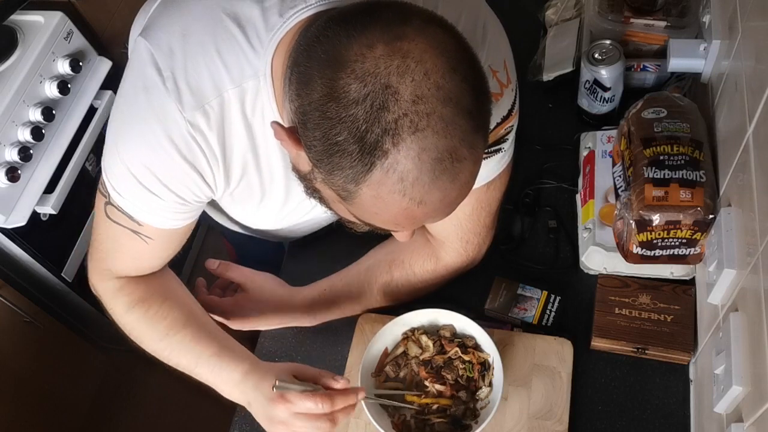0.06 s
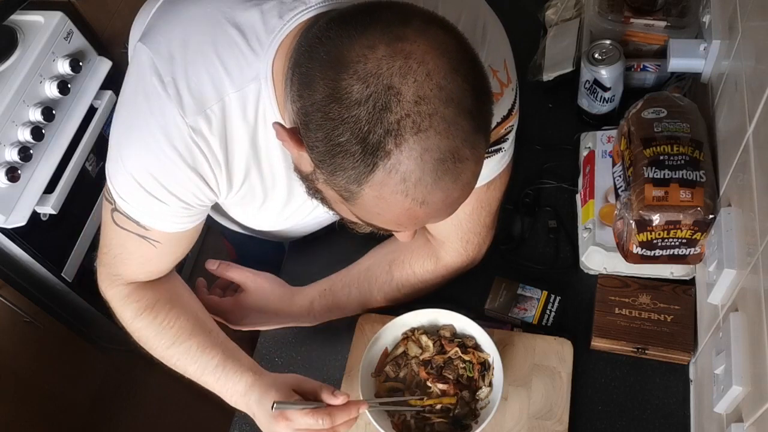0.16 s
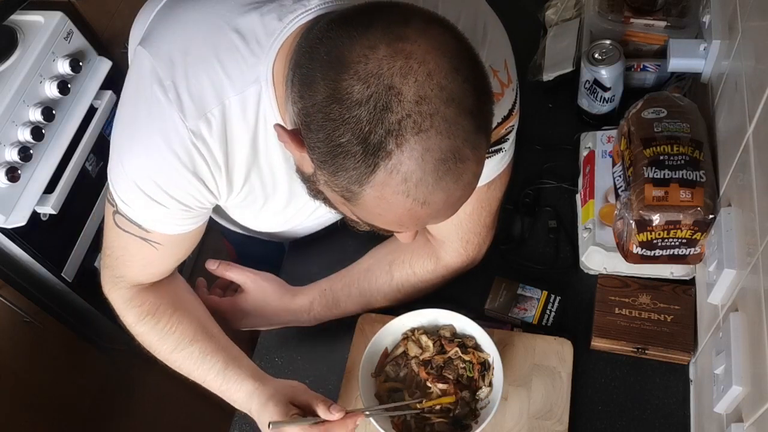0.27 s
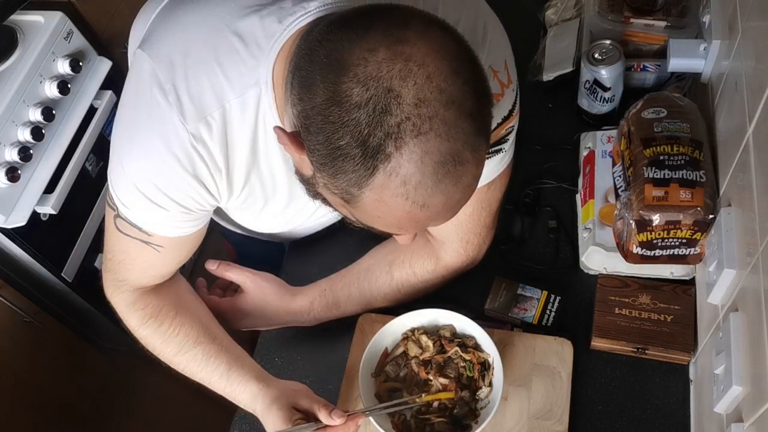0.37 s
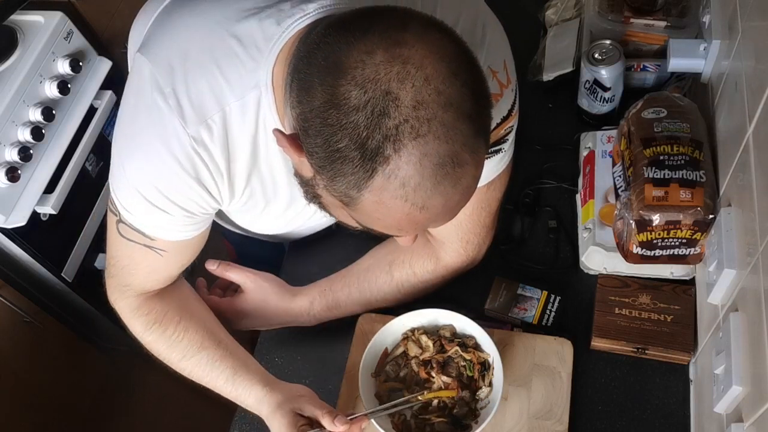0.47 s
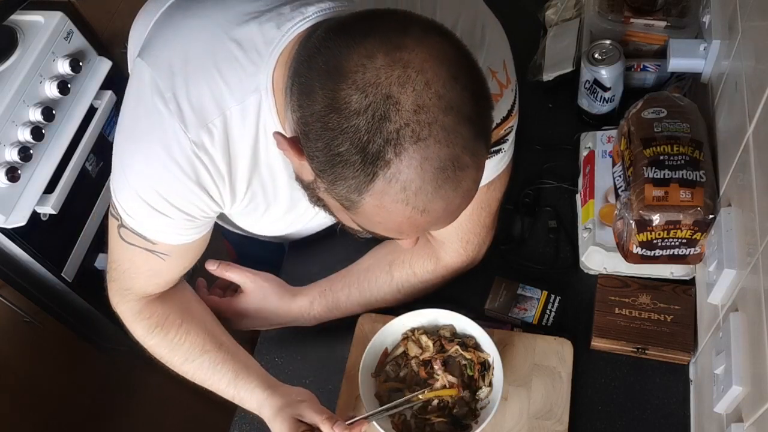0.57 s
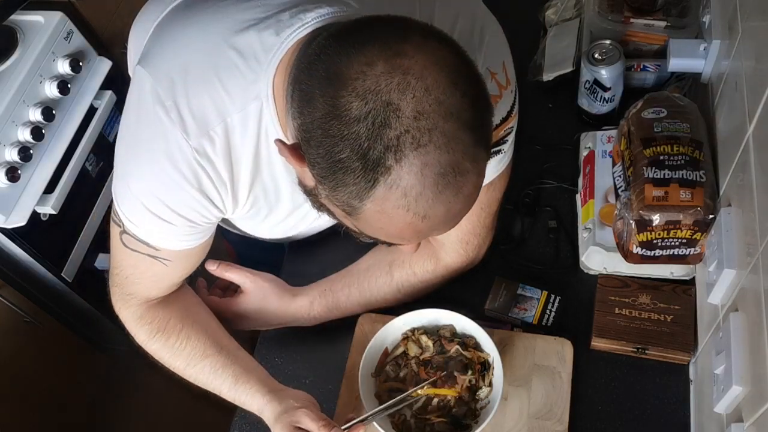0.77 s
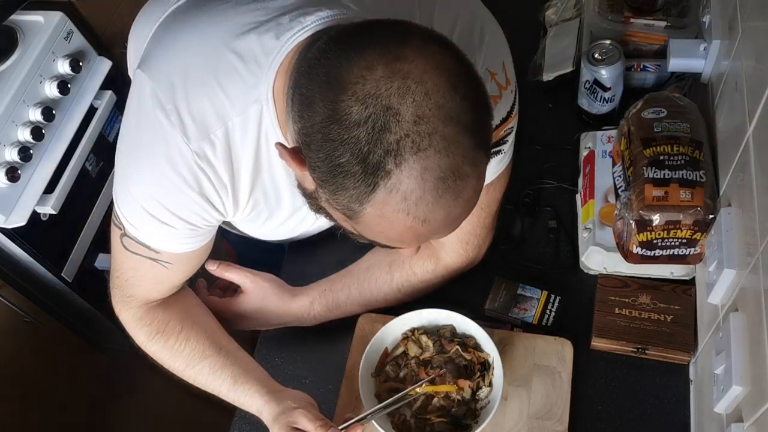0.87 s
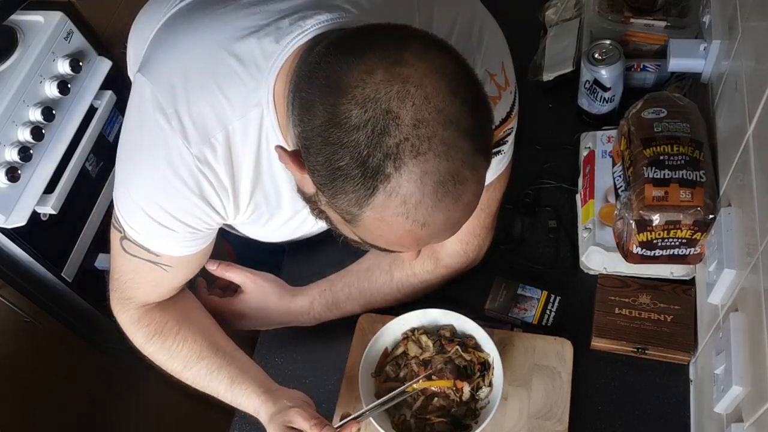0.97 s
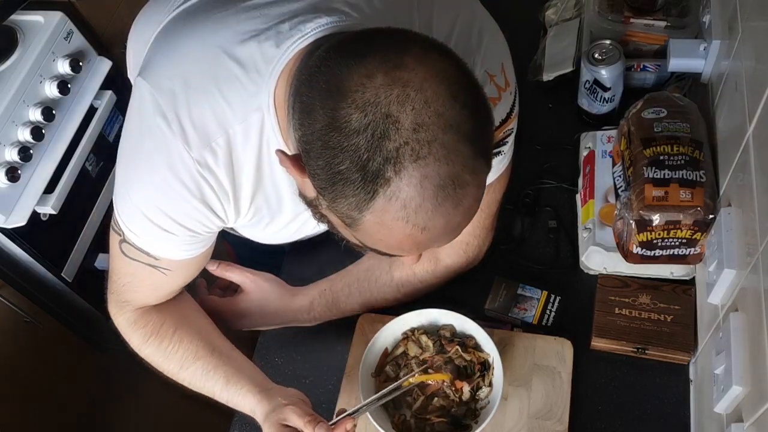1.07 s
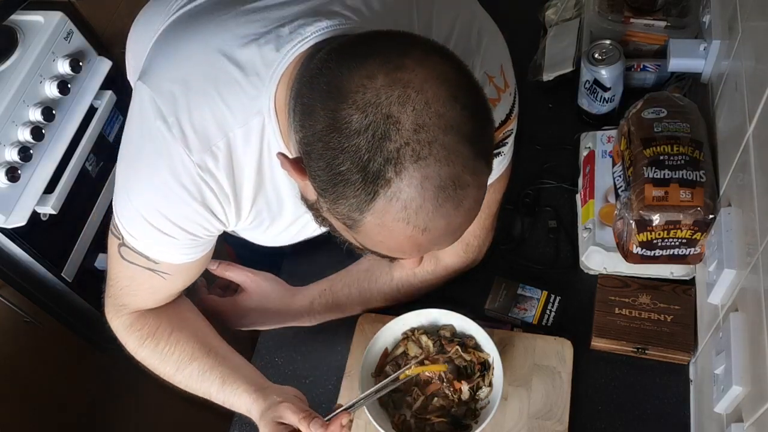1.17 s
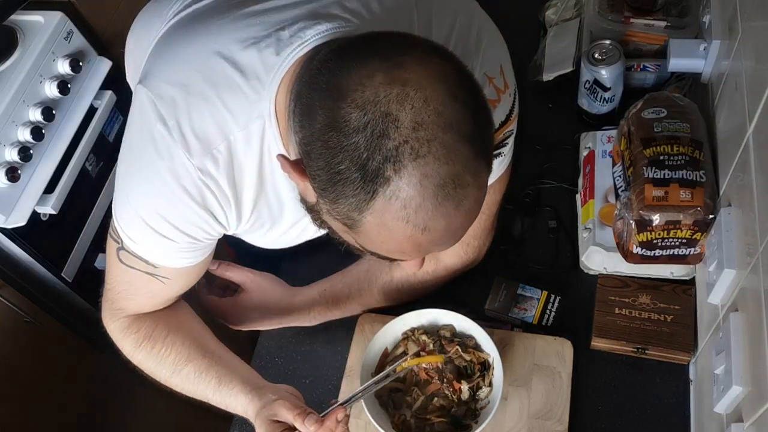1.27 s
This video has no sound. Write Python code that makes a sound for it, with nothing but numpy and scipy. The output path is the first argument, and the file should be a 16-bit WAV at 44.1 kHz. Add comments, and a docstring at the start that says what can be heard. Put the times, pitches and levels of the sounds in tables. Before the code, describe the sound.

After a barely audible rustle of noodles, chopsticks clack rapidly twice on a bowl rim, ringing briefly with a short room tail; soft moist stirring follows, close up indoors, over steady faint hiss and mains hum.

```python
"""In a small kitchen, metal chopsticks give a quick double clack at a ceramic bowl.
Each contact is a noise crack that excites decaying modes of the sticks and, a little longer, the bowl.
A dull thud and a low swell follow. Before and after, filtered grains make soft strokes through wet
noodles, with short pitched noise bursts as squelches. Random reflections and a decaying tail carry
clacks and noodles; mains hum from sines and thin hiss from coloured noise lie beneath."""
import sys
import numpy as np
from scipy import signal
from scipy.fft import rfft, irfft
from scipy.io import wavfile
from scipy.ndimage import uniform_filter1d

SR = 44100
rng = np.random.default_rng(int(sys.argv[2]) if len(sys.argv) > 2 else 0)


def dump_mix(stems):
    """Bounce the given channels to the path in sys.argv[1] as a 16-bit WAV at rate SR."""
    frames = np.atleast_2d(stems).T  # one column per channel
    limited = np.clip(frames, -1, 1)  # hard clip at full scale
    pcm = np.round(limited * 32767).astype(np.int16)
    wavfile.write(sys.argv[1], SR, pcm)


N = 57330
T, HZ = np.arange(N) / SR, np.fft.rfftfreq(2 * N, 1 / SR)  # time in s, frequency in Hz

# Contacts of sticks and bowl, the last two only 3 ms apart:
# start_s [s], level_db [dB, relative], brightness [dB per octave], bowl_share_db [dB]
CONTACTS = [(0.2001, 1.5, -2.5, -13), (.2162, 0.5, 3.5, -2), (.2192, -5.5, 1, 3)]
# Bending modes of the two sticks, damped by the fingers: pitch_hz [Hz], level_db [dB], t60_s [s]
STICK_MODES = [(1080, -10, 0.045), (1241.5, -11, .07), (2495, -12, 0.024), (2800, -5, 0.021),
               (3546, -1.5, 0.035), (3900, -2.5, 0.041), (4470, -1, 0.027), (4592, -14, 0.038),
               (5650, -3, 0.016), (6148, 5, 0.017), (6465, -4, 0.018), (8010, -10.5, 0.019),
               (9050, -9, 0.039), (10630, -7, 0.025), (11350, -9.5, 0.068), (13450, -6, 0.031)]
# Modes of the glazed bowl: pitch_hz [Hz], level_db [dB], t60_s [s]
BOWL_MODES = [(3465, -28, 0.082), (3725, -21, 0.26), (4039, -11, .17), (6150, -20, .17), (6050, -18, 0.12),
              (5960, -12, 0.29), (9150, -18, 0.15), (11247, -20.5, 0.11), (13640, -25, .1)]
# Colour of a whole contact, crack and ring together: frequency_hz [Hz], gain_db [dB]
CONTACT_COLOUR = [(100, -21), (250, -7.5), (480, -10.5), (600, -27), (830, -12), (1030, -7), (1300, -7.5),
                  (1600, -12), (1900, -18), (2300, -2), (2780, -1.5), (3120, -3.5), (3450, 1), (4600, 0),
                  (5000, 2), (5700, -0.5), (6700, 0.5), (7600, -2), (11000, -4), (14500, -7), (16000, -24)]
CLACK_DB, CRACK_DB = -22, 4.5  # all contacts; crack relative to the ring
CONTACT_RISE_S, CRACK_DECAY_S = 0.00031, 0.0026
PIVOT_HZ = 4500  # brightness tilts about this frequency
STICK_RATTLE, BOWL_RATTLE = 0.49, 1  # unsteadiness of the ring; the sticks lie against the rim
RATTLE_HZ = 63


def clacks():
    """Impact excitation: each short contact cracks and rings both bodies, with its own spectral tilt."""
    out = np.zeros(N)
    octaves = np.log2(np.clip(HZ, 2200, 16000) / PIVOT_HZ)
    rise = 1 - np.exp(-T / CONTACT_RISE_S)
    burst = rise * np.exp(-T / CRACK_DECAY_S)
    for start_s, level_db, brightness, bowl_share_db in CONTACTS:
        crack = np.linalg.norm(burst) * even(rng.standard_normal(N) * burst)
        sticks = ring(STICK_MODES, STICK_RATTLE)
        bowl = amp(bowl_share_db) * ring(BOWL_MODES, BOWL_RATTLE)
        contact = amp(CRACK_DB) * crack + rise * (sticks + bowl)
        contact = colour(contact, read(CONTACT_COLOUR) + brightness * octaves)
        out += amp(level_db) * later(contact, start_s)
    return amp(CLACK_DB) * out


def ring(modes, rough):
    """Modal superposition: damped partials, each randomly modulated in amplitude and phase."""
    t, out = T[:N // 4], np.zeros(N)
    smooth = signal.butter(2, RATTLE_HZ, fs=SR)
    for pitch_hz, level_db, t60_s in modes:
        noise = signal.lfilter(*smooth, rng.standard_normal((2, 2 * len(t))))
        in_phase, quadrature = unit(noise[:, len(t):])  # the filter's onset is dropped
        phase = 2 * np.pi * (pitch_hz * t + rng.random())
        partial = (1 + rough * in_phase) * np.cos(phase) + rough * quadrature * np.sin(phase)
        out[:len(t)] += amp(level_db - 60 * t / t60_s) * partial
    return out / np.sqrt(1 + 2 * rough ** 2)  # roughness leaves the mean power alone


# Colour of the bowl's thud on its wooden board: frequency_hz [Hz], gain_db [dB, relative]
THUD_COLOUR = [(50, -12), (115, -9.5), (170, -12), (250, -1), (320, -2.5), (430, 3), (510, -4.5),
               (580, -18.5), (2000, -40)]
THUD_DB, THUD_RISE_S, THUD_DECAY_S = -50.5, 0.018, 0.051
BOOM_HZ, BOOM_DB = 370, -50.5
BOOM_SPREAD_RAD = 1.16  # phase lead of the right channel
BOOM_LAG_S, BOOM_WIDTH_S = .074, .036  # peak after the first contact, width of the bell


def push():
    """Damped impact and resonance: a dull thud on the board, then a low room resonance that swells."""
    start_s = CONTACTS[0][0]
    envelope = later(swell(THUD_RISE_S, THUD_DECAY_S), start_s)
    thud = shaped(colour(pair_noise(), read(THUD_COLOUR)), envelope)
    phase = 2 * np.pi * (BOOM_HZ * T + rng.random()) + np.array([[0], [BOOM_SPREAD_RAD]])
    bell = np.exp(-((T - start_s - BOOM_LAG_S) / BOOM_WIDTH_S) ** 2)
    return amp(THUD_DB) * thud + amp(BOOM_DB) * bell * np.sin(phase)


# Strokes through the noodles:
# start_s [s], length_s [s], level_db [dB, relative], centre_hz [Hz], width [octaves]
STROKES = [(0.109, 0.076, -63, 413, 0.95), (0.094, 0.12, -68, 2000, 1.5), (0.393, 0.046, -59, 3470, 1.55),
           (0.483, 0.025, -58.5, 4630, 0.55), (0.643, 0.069, -60.5, 1720, 1.6),
           (0.786, 0.02, -64.5, 2150, .6), (0.85, 0.099, -60, 2500, 2.4), (0.89, .15, -60.5, 4970, 0.47),
           (1.081, 0.058, -61.5, 910, 1.64)]
# Wet squelches: start_s [s], level_db [dB, relative], pitch_hz [Hz], decay_s [s]
WET_SQUELCHES = [(0.693, -59, 1080, 0.006), (.960, -60.5, 756, 0.007), (.964, -51.5, 1490, 0.003),
                 (0.962, -61, 3020, 0.0079), (1.078, -59, 357, 0.01), (1.244, -65.5, 2280, 0.015)]
NOODLES_DB = 0.5
GRAINS_PER_S, GRAIN_SPREAD_DB = 3500, 3
SQUELCH_WIDTH_OCTAVES, SQUELCH_RISE_S = .16, .003


def noodles():
    """Granular friction: strokes of tiny sticky crackles, and narrow-band squelches with a pitch."""
    out = np.zeros(N)
    for start_s, length_s, level_db, centre_hz, width in STROKES:
        sizes = rng.standard_normal(N) * amp(GRAIN_SPREAD_DB * rng.standard_normal(N))
        grains = sizes * (rng.random(N) < GRAINS_PER_S / SR)
        arch = np.sqrt(abs(np.sin(np.pi * np.clip((T - start_s) / length_s, 0, 1))))
        band_db = bump(centre_hz, width) - 10 * np.log10(1 + HZ / centre_hz)  # softened treble
        out += amp(level_db) * shaped(colour(grains, band_db), arch)
    for start_s, level_db, pitch_hz, decay_s in WET_SQUELCHES:
        noise = colour(rng.standard_normal(N), bump(pitch_hz, SQUELCH_WIDTH_OCTAVES))
        out += amp(level_db) * shaped(noise, later(swell(SQUELCH_RISE_S, decay_s), start_s))
    return amp(NOODLES_DB) * out


# Decay of the room: frequency_hz [Hz], t60_s [s]
ROOM_DECAY = [(150, 0.6), (500, 0.53), (1300, 0.28), (3700, .37), (6500, 0.3858), (10000, 0.19),
              (15000, 0.43)]
# Colour of the reverberant tail, relative to the early sound: frequency_hz [Hz], gain_db [dB]
TAIL_COLOUR = [(150, 2.5), (500, -2), (1300, -0.5), (3700, -4), (6500, -3), (10000, 3.5), (15000, -6)]
# Tilt of the room sound to the left: frequency_hz [Hz], left_minus_right_db [dB]
ROOM_LEAN = [(200, -4.5), (380, 1.5), (700, 3.5), (1300, 3.5), (2500, 6), (3600, 0), (6200, 0), (9000, 6),
             (15000, 11)]
ROOM_BUILD_S, NEAR_S = 0.0072, 0.0042  # build-up of the tail, decay of the quick reflections
NEAR_DB, DIRECT_DB = 0.5, -7.5  # early sound; direct sound relative to the quick reflections


def kitchen(x):
    """Room impulse response: direct sound, quick reflections off worktop and tiles, and a short tail."""
    hz, t, z = signal.stft(pair_noise(), SR, nperseg=256)
    decay = amp(-60 * t / read(ROOM_DECAY, hz)[:, None])
    tail = signal.istft(z * decay, SR, nperseg=256)[1][:, :N]
    tail = tail * (1 - np.exp(-T / ROOM_BUILD_S))
    near = pair_noise() * np.exp(-T / NEAR_S)
    early = near / np.linalg.norm(near, axis=1, keepdims=True) + amp(DIRECT_DB) * (T == 0)
    paths = []  # one to each of two microphones
    for first, rest in zip(early, tail):
        path = amp(NEAR_DB) * even(first) + colour(even(rest), read(TAIL_COLOUR))
        paths.append(even(path))
    heard = signal.fftconvolve(x[None], np.array(paths), axes=1)[:, :N]
    return lean(heard, read(ROOM_LEAN))


# Colour of the hiss: frequency_hz [Hz], density_db [dB per Hz, relative]
HISS_COLOUR = [(20, 6.5), (70, -0.5), (130, -0.5), (220, -2.5), (400, -6), (600, -4.5), (1000, -10),
               (1800, -8.5), (3200, -6), (4700, -0.5), (5800, -2.5), (6950, -0.5), (7500, -10),
               (9000, -8.5), (11200, -4.5), (14000, -11), (16000, -12.5)]
# Tilt of the hiss to the left: frequency_hz [Hz], left_minus_right_db [dB]
HISS_TILT = [(60, -7.5), (300, 0), (1000, 4), (4000, 0.5), (8000, 3), (15000, 13)]
# Partials of the mains hum: pitch_hz [Hz], level_db [dB rms, before waver and tilt]
HUM_PARTIALS = [(49.7, -64.5), (100.5, -81.5), (394, -82)]
HISS_DB = -59
HUM_LEAN_DB, HUM_WAVER = -1, 0.11  # left minus right; relative rms depth


def background():
    """Stationary noise and periodic sound: steady hiss and a slightly wavering mains hum."""
    hiss = lean(unit(colour(pair_noise(), read(HISS_COLOUR))), read(HISS_TILT))
    hum = np.zeros(N)
    for pitch_hz, level_db in HUM_PARTIALS:
        hum += amp(level_db) * unit(np.sin(2 * np.pi * (pitch_hz * T + rng.random())))
    hum = hum * (1 + HUM_WAVER * waver(rate_hz=4.2))
    return amp(HISS_DB) * hiss + hum * amp([[HUM_LEAN_DB / 2], [-HUM_LEAN_DB / 2]])


def waver(rate_hz):
    """Low-pass noise: slow random motion of rms 1."""
    noise = rfft(rng.standard_normal(2 * N))
    return unit(irfft(noise / (1 + (HZ / rate_hz) ** 4))[:N])


# Likeness of the noise at two close microphones: frequency_hz [Hz], correlation [-1 to 1]
LIKENESS = [(40, 0.82), (140, 0.98), (280, 0.66), (500, 0.23), (3000, -0.031), (15000, 0.1)]


def pair_noise():
    """Diffuse-field coherence: a noise pair alike in the bass, nearly unrelated in the treble."""
    a, b = rfft(rng.standard_normal((2, 2 * N)))
    alike = np.clip(read(LIKENESS), -1, 1)
    return irfft(np.array([a, alike * a + np.sqrt(1 - alike ** 2) * b]))[:, :N]


def colour(x, db):
    """Minimum-phase filtering: a causal filter with the given gain at each frequency."""
    cepstrum = irfft(np.log(amp(np.maximum(db, -100))))
    cepstrum[1:N] *= 2  # folding the cepstrum makes the filter causal
    cepstrum[N + 1:] = 0
    return irfft(rfft(x, 2 * N) * np.exp(rfft(cepstrum)))[..., :N]


def even(x):
    """Spectral whitening: takes broad humps and dips out of a random burst, leaving about unit energy."""
    smoothing_hz = 220
    power = uniform_filter1d(abs(rfft(x, 2 * N)) ** 2, size=round(smoothing_hz / HZ[1]))
    return colour(x, -10 * np.log10(abs(power) + 1e-12))


def lean(pair, db):
    """Interaural level difference: tips a stereo pair to the left by db at each frequency."""
    return np.array([colour(pair[0], db / 2), colour(pair[1], -db / 2)])


def bump(centre_hz, octaves):
    """Band-pass response: a bell on a log-frequency axis, in dB, 4.3 dB down at the given octaves."""
    return np.maximum(-4.3 * (np.log2((HZ + 1) / centre_hz) / octaves) ** 2, -60)


def swell(rise_s, decay_s):
    """Exponential envelope: a soft rise and a decay, peak 1."""
    shape = (1 - np.exp(-T / rise_s)) ** 2 * np.exp(-T / decay_s)
    return shape / shape.max()


def shaped(noise, envelope):
    """Amplitude modulation: noise under an envelope, with the energy of that envelope."""
    return unit(noise * envelope) * np.sqrt(np.mean(envelope ** 2))


def later(x, s):
    """Pure delay: moves a sound to the time s in seconds."""
    return np.concatenate([np.zeros(max(round(s * SR), 0)), x])[:N]


def read(points, hz=HZ):
    """Log-frequency interpolation of a table."""
    f, value = np.transpose(points)
    return np.interp(np.log(hz + 1), np.log(f + 1), value)


def amp(db):
    """Decibel law: level to amplitude gain."""
    return 10 ** (np.asarray(db) / 20)


def unit(x):
    """Power normalisation: scales to rms 1."""
    return x / np.sqrt(np.mean(x ** 2) + 1e-20)


def scene():
    """Superposition: clacks and noodles sound through the kitchen; thud, swell and background add to it."""
    return kitchen(clacks() + noodles()) + push() + background()


def record(dry):
    """Band limitation: a linear-phase low-pass ends the treble."""
    edge_hz = 15950
    low_pass = signal.firwin(511, edge_hz, window=("kaiser", 9), fs=SR)
    return signal.oaconvolve(dry, low_pass[None], "same")


dry = scene()
out = record(dry)
dump_mix(out)
```